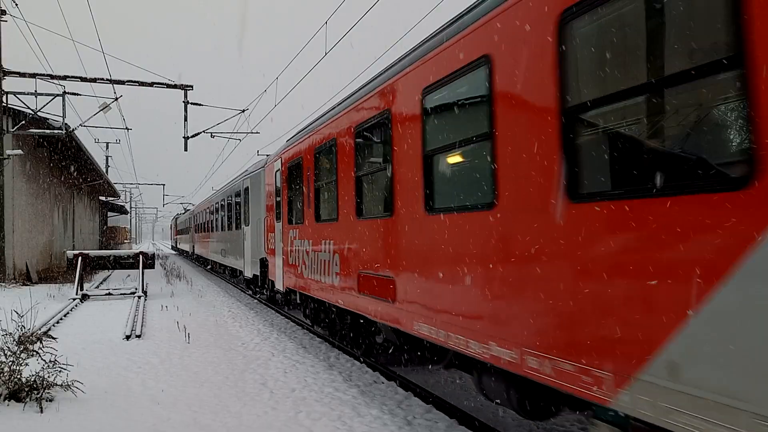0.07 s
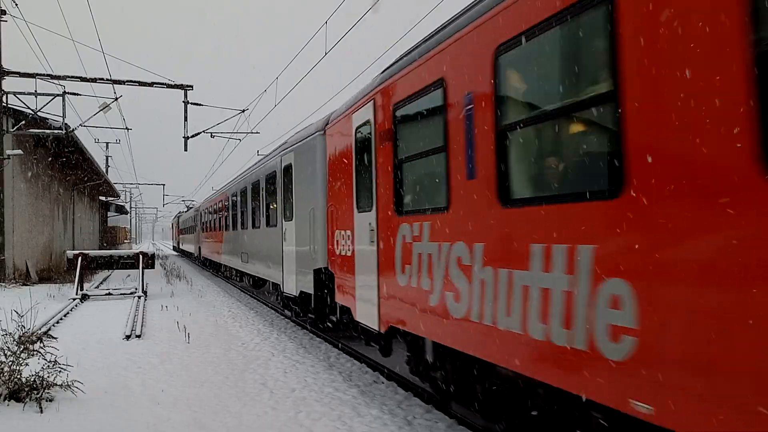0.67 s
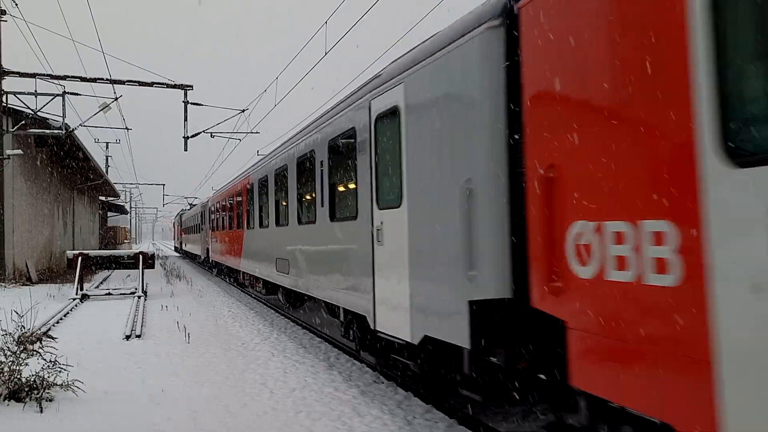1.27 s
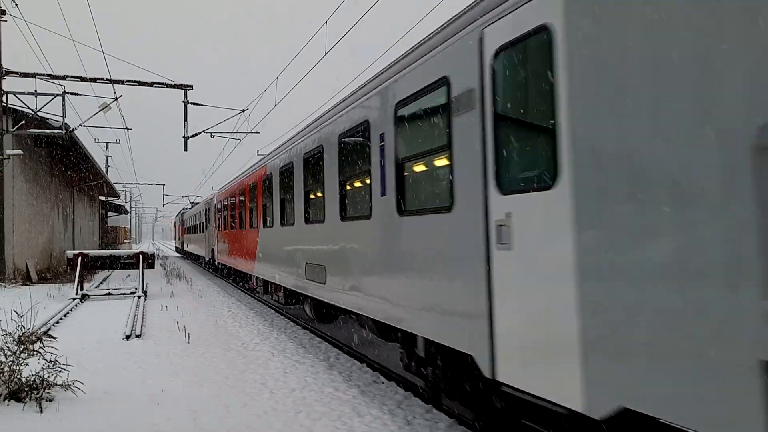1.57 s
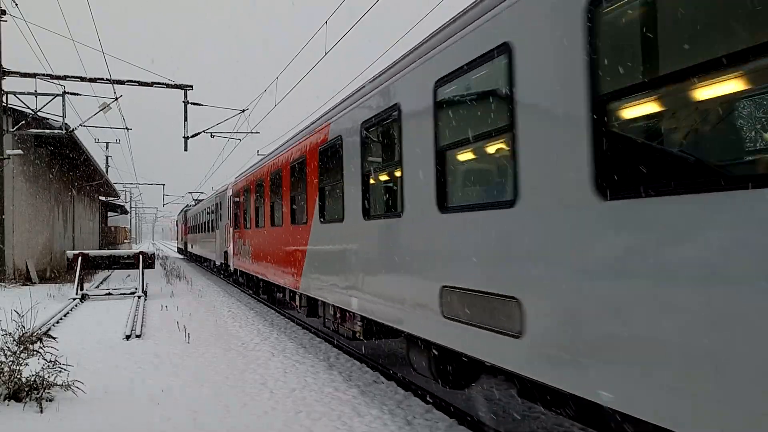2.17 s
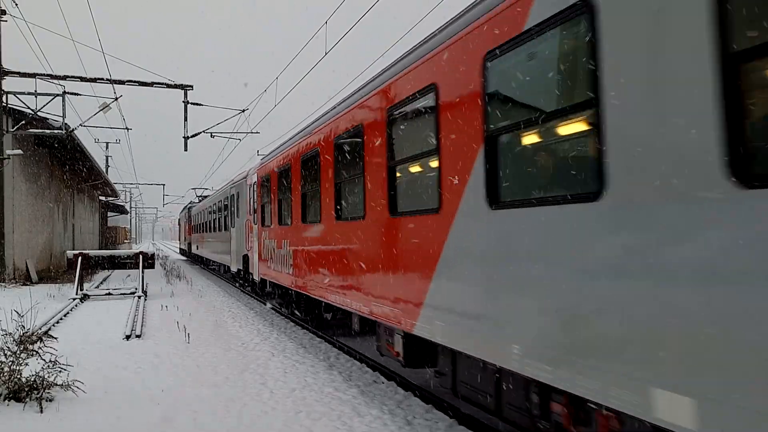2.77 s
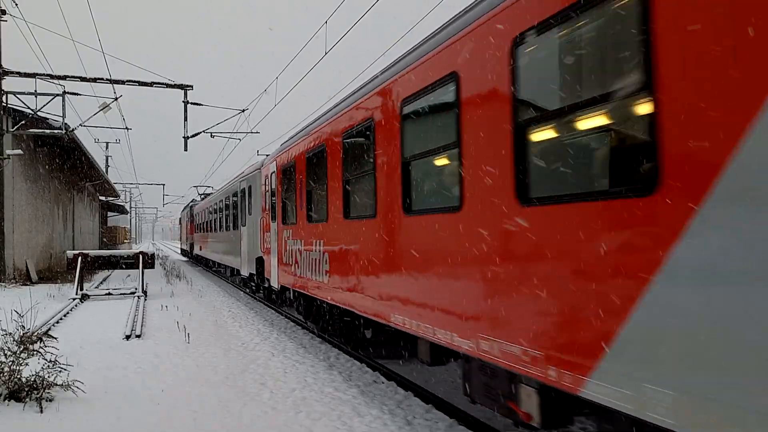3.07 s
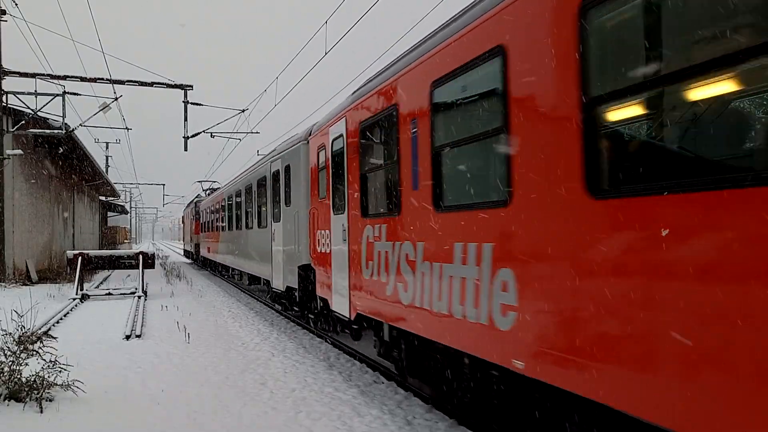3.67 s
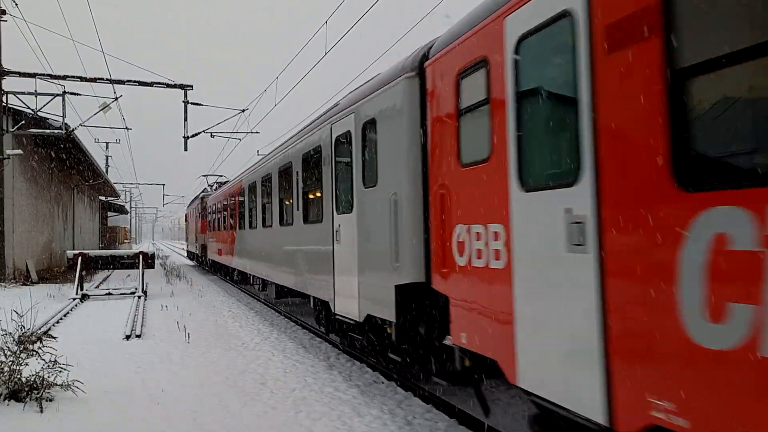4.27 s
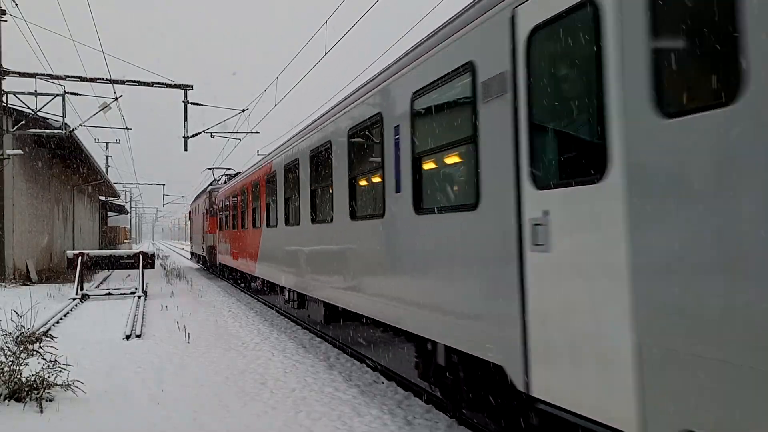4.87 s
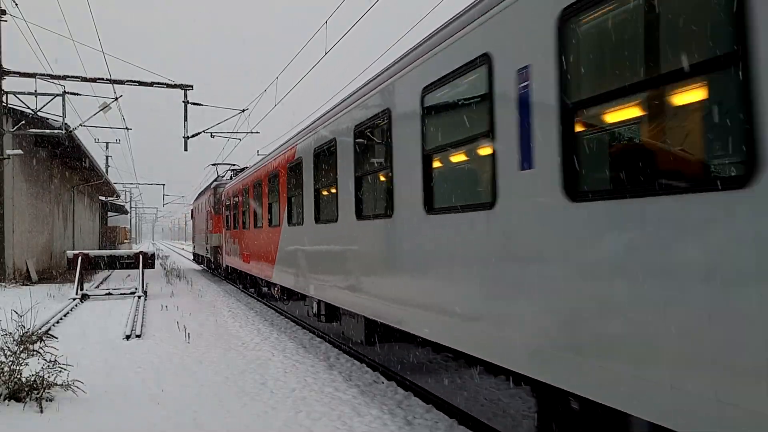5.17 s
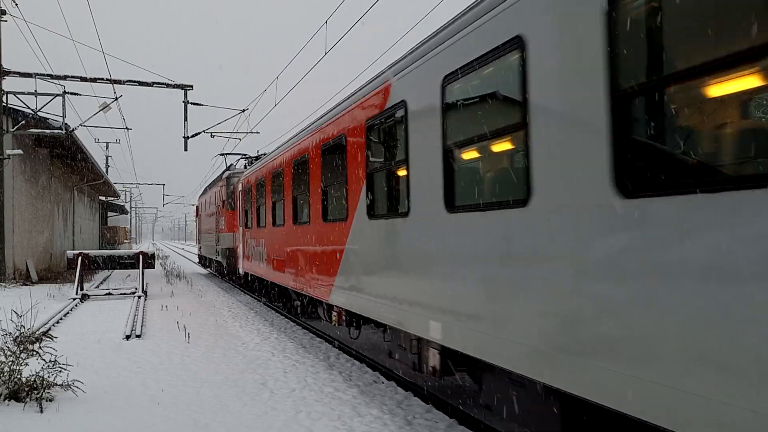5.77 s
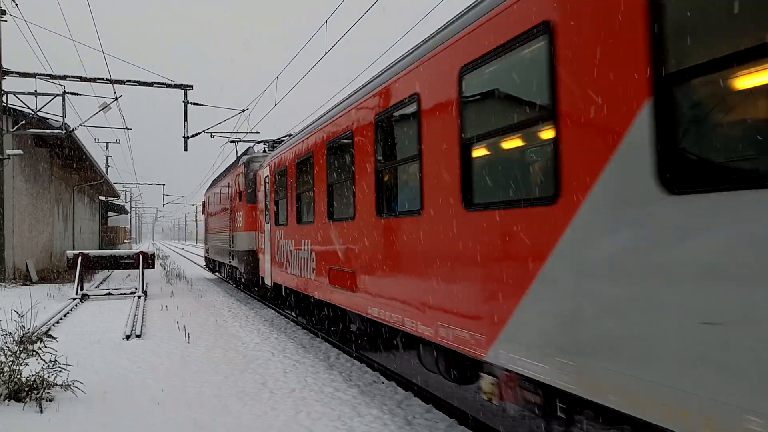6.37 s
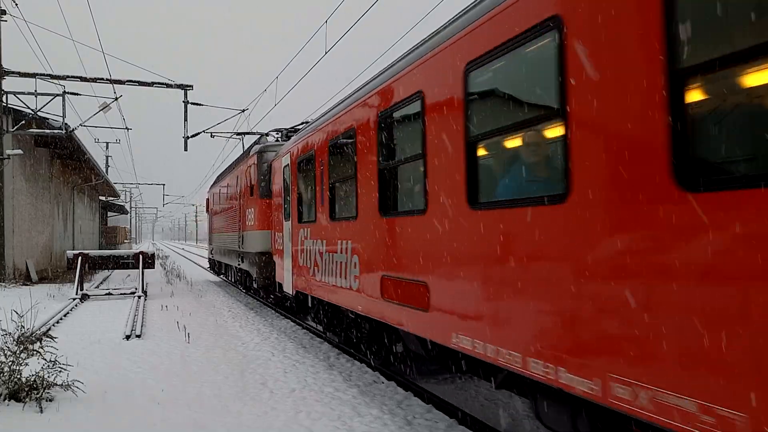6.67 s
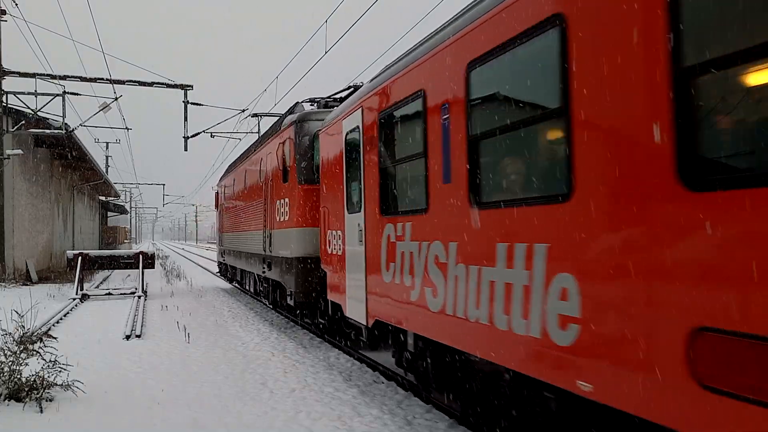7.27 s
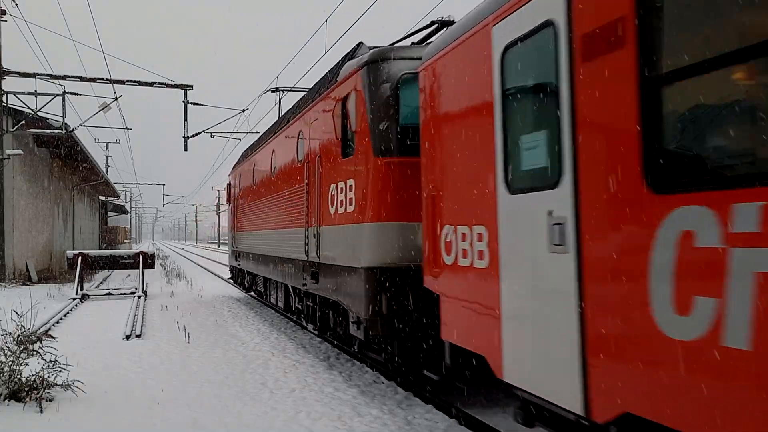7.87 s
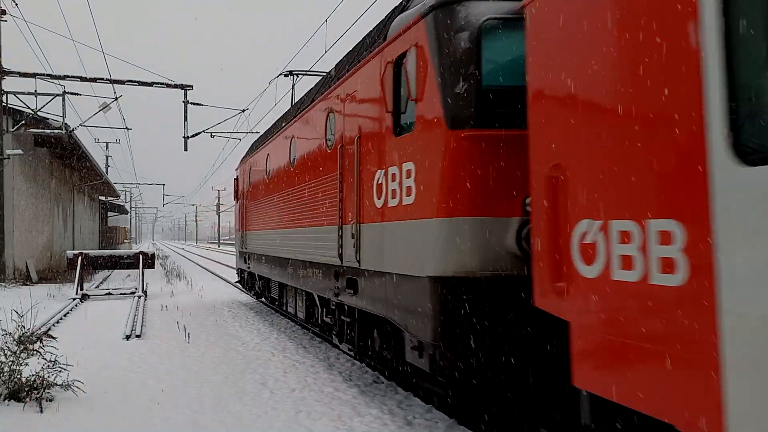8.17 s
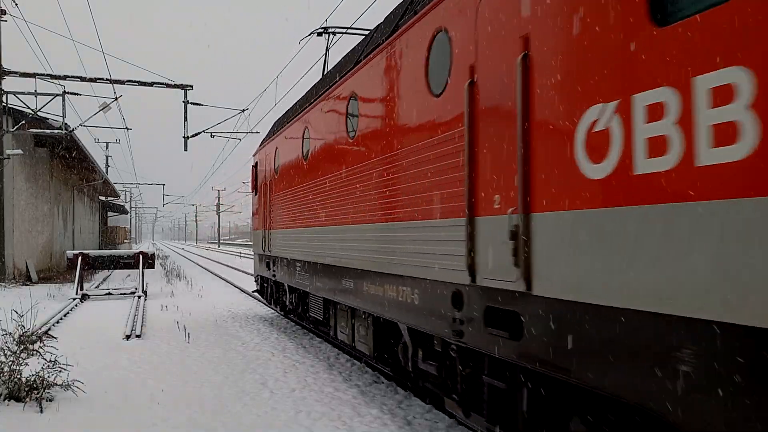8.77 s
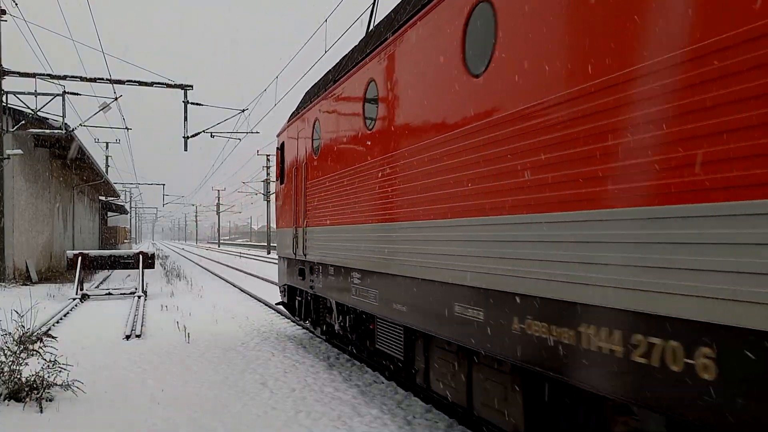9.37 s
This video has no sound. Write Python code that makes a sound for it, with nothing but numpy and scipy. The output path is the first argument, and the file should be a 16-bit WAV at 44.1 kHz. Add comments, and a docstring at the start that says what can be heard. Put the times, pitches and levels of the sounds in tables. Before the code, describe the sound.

A passenger train rumbles and hisses past close by, a valve releasing whistling compressed air before the locomotive follows with roaring fans and falling whine.

```python
"""Beside a snowy railway track, a passenger train rolls by a few metres to the right; a shed on the left
echoes it. The wheels make the track rumble, ring like bells and whirl up snow, and the train's wind thumps
the two microphones. A valve lets out compressed air for four seconds with a hoarse whistle. Last comes the
locomotive, pushing from behind, with roaring cooling fans, a hum and a falling gear whine."""
import sys
import numpy as np
from scipy import signal
from scipy.fft import rfft, irfft, next_fast_len
from scipy.io import wavfile
from scipy.ndimage import uniform_filter1d, map_coordinates

SR = 44100
rng = np.random.default_rng(int(sys.argv[2]) if len(sys.argv) > 2 else 0)


def inscribe(sig):
    """Save sig as 16-bit PCM at rate SR to the path in sys.argv[1].

    A 1-D sig is mono; a 2-D sig holds one channel per row.
    Samples are clipped to [-1, 1] before scaling.
    """
    pcm = np.round(np.clip(np.atleast_2d(sig).T, -1, 1) * 32767)
    wavfile.write(sys.argv[1], SR, pcm.astype(np.int16))


N = 419391
TIME = np.arange(N) / SR
SPEED_M_PER_S = 8
MIC_GAP_MS = 0.48  # time sound takes from one microphone to the other

# Levels are relative: the functions add their own gains. A "width" in seconds is half a bump's length.
# loudness of the passing coaches: t/s, rumble level/dB, hiss level/dB
COACH_LEVELS = [(0, -34.5, -42), (.4, -34.5, -40.5), (.75, -32, -40), (.8, -29, -39), (1.05, -29.5, -39.5),
                (1.2, -33, -44), (1.4, -33.5, -44), (1.62, -34, -44), (1.85, -34, -42), (2.1, -34.5, -46),
                (2.35, -33.5, -44), (2.82, -35.5, -43), (3.05, -38, -48), (3.45, -38, -48),
                (3.75, -37.5, -46.5), (4.1, -37.5, -47.5), (4.75, -35.5, -47), (5.1, -34.5, -45),
                (5.8, -36, -43), (6.3, -36, -46.5), (7.1, -36, -45), (7.65, -33.5, -45), (8, -38, -45.5)]
# tone colour of the track's rumble and of the wheels' hiss: f/Hz, level/dB
RUMBLE_COLOUR = [(25, -35), (55, -19), (75, -7), (105, -1.5), (165, -4), (215, -7), (255, -3.5), (320, -8),
                 (385, -4.5), (440, -1.5), (520, -6), (650, -13), (900, -20.5), (1400, -44.5)]
HISS_COLOUR = [(400, -28), (600, -4), (780, -2), (1000, 0), (1400, 0.5), (1700, -2), (2150, -2),
               (2350, -6.5), (2800, -6.5), (3050, -9.5), (3400, -10.5), (4300, -12), (6500, -22),
               (8000, -37), (16000, -46)]
# ringing notes of the track, the wheels, and one thin, high wheel ring: f/Hz, width/Hz, level/dB
TRACK_NOTES = [(254, 24, -12.5), (431, 26, -10)]
WHEEL_NOTES = [(1160, 90, -13), (1797, 110, -8.5), (1934, 110, -12)]
SIZZLE_NOTES = [(12150, 400, -51), (13450, 450, -49)]
# loudness of the ringing wheel rims: t/s, level/dB
RIM_LEVELS = [(0, -47), (.9, -48), (1.5, -55), (1.85, -46), (2.1, -53), (2.75, -46), (3.05, -49.5),
              (3.7, -47.5), (4.15, -50), (6.4, -51)]
# single wheels make the track drone, the last axles make it boom: t/s, hold/s, level/dB, f/Hz
TRACK_DRONES = [(0.803, .03, -28, 449), (1.356, 0.079, -30, 250), (1.788, 0.17, -32, 440),
                (2.218, 0.29, -36.5, 256), (5.057, 0.13, -33, 423.4), (5.605, 0.31, -33, 251),
                (7.547, 0.14, -34.5, 432)]
AXLE_BOOMS = [(7.48, 0.097, -27.5, 132.4), (7.681, 0.073, -26, 117.8), (7.795, 0.06, -21.5, 113.4)]
# tone colour of the valve's first rush and of its steady jet: f/Hz, level/dB
RUSH_COLOUR = [(3000, -30), (3500, -3), (3900, 2), (4550, 8.5), (5300, -1.5), (5800, -3), (6400, -7),
               (7500, 3.5), (8100, -4), (8600, -5), (9300, -4), (10000, -2), (10700, 5), (11400, 5),
               (12100, 2), (13200, 3.5), (14400, 0), (15600, 4)]
JET_COLOUR = [(3000, -24), (3700, -3), (5150, -2), (5600, -6), (6200, -11.5), (7600, -4.5), (8500, -5.5),
              (9100, -6.5), (9900, -7), (10900, -4), (12700, -2), (13700, -2), (14900, -2), (15700, 1)]
# strength of the jet: t/s, level/dB
JET_LEVELS = [(3.6, -43), (4.9, -50), (5.55, -40), (6.6, -39), (7.05, -34.5), (7.62, -35.5)]
# the jet's two whistles: f/Hz, width/Hz, level/dB, share the pitch sinks by, stereo spread
WHISTLE_NOTES = [(4740, 180, -34.5, .043, 2.3), (11810, 640, -35.5, 0.028, 3.2)]
# how far the whistles have formed: t/s, low one's level/dB, high one's level/dB
WHISTLE_GROWTH = [(3.6, -32, -36), (4.4, -12.5, -22), (5.27, -4.5, -5), (5.65, -3, 2), (7.4, -2.5, -0.5),
                  (7.64, -5, 1)]
# spurts of air pressure: t/s, width/s, low whistle's boost/dB, high whistle's boost/dB
SURGES = [(5.334, 0.022, 2.5, -3), (5.408, .03, 4.5, 4), (5.58, .04, 3, 1), (5.72, 0.075, 5.5, -1),
          (5.83, .035, 9.5, -3), (5.958, .035, 3.5, -2), (6.12, .04, 5, 0), (6.196, .025, 3, -1),
          (6.32, 0.043, 0, -2), (6.53, 0.053, 4.5, 0.5), (6.73, .04, 2.5, 0), (6.9, .055, 7.5, 5),
          (7.07, 0.03, 7, 2.5), (7.145, 0.024, 7, 1), (7.22, .045, 10, 1), (7.378, 0.032, 7.5, 3),
          (7.47, .04, 2, 5), (7.593, .04, 3, -1)]
# tone colour of booming axles, the locomotive's body and its cooling air: f/Hz, level/dB
BOOM_COLOUR = [(25, -45), (50, -13), (80, 2), (110, 11), (145, 7), (200, -16), (290, -37.5)]
DRONE_COLOUR = [(90, -53), (150, -4), (205, 7), (260, 1.5), (330, -0.5), (440, -.5), (540, -5.5),
                (650, -12.5), (900, -18.5), (1500, -28.5)]
BLOWER_COLOUR = [(300, -30), (600, -6), (950, -7.5), (1350, -5.5), (1850, -2.5), (2230, -5.5), (2800, -8.5),
                 (3600, -5), (4300, -11), (6000, -10.5), (8000, -23), (9000, -23.5), (13000, -22),
                 (15800, -36)]
# the locomotive's humming notes, each with one swell: f/Hz, level/dB, swell t/s, boost/dB
HUM_NOTES = [(141.6, -11.5, 9.3, 11.5), (161.2, -12, 8.55, 8), (209.9, -11.5, 8.13, 13.5),
             (251, -15.5, 9.33, 12), (408.5, -8, 9.05, 4.5), (529, -13, 8.02, 8.5)]
# directions of the locomotive and of the shed's echo: t/s, delay at the left microphone/ms
LOCOMOTIVE_LAG = [(6.5, -0.013), (8, -0.027), (8.7, 0.086), (9.5, 0.25)]
ECHO_LAG = [(0, -0.31), (4, -0.47), (6.3, -0.4), (7.5, -0.39), (8.8, -0.48)]
# falling pitch of the gear teeth: t/s, f/Hz
GEAR_PITCH = [(6, 2344), (7.6, 2120), (8.4, 1894), (9.5, 1543)]
# the motor's upper and lower note: share of the gear pitch, level/dB
MOTOR_NOTES = [(.25, 0.46), (.087, 5.2)]
# brief swells of the gear whine and of the upper motor note: t/s, width/s, boost/dB
GEAR_FLARES = [(8.38, 0.072, 9), (8.72, 0.09, 5.5)]
MOTOR_FLARES = [(8.27, 0.052, 10.5), (8.97, 0.11, 15.5)]
# squeals of a flange (a wheel's guiding lip), wind gusts and snow clouds: t/s, hold/s, level/dB
SQUEALS = [(6.7, 0.93, -45), (7.7, 0.13, -36.5), (7.98, 0.08, -34.5)]
GUSTS = [(.81, 0.324, -22.5), (2.6, 0.4, -34), (3.18, 0.6, -31), (3.95, 0.55, -35.5), (5.42, 0.4, -36.5)]
SNOW_CLOUDS = [(.42, 0.23, -41.5), (2.7, 0.46, -56.5)]
# swirls of air hitting the microphones: t/s, peak level/dB, f/Hz, left minus right/dB, width/s
EDDIES = [(0.584, -21, 450, 0, .006), (0.853, -18, 128, -13, 0.015), (0.948, -16, 150, -1, .012),
          (1.015, -17.5, 140, 10, .008), (1.049, -17, 190, -11, .006), (1.106, -12.5, 250, -10, 0.0064),
          (1.144, -16, 130, 2, 0.011), (1.411, -26, 160, 5, .009), (1.771, -22, 540, 0, .004),
          (1.862, -20, 430, -1, .005), (2.066, -17.5, 170, 0, .012), (2.357, -16, 160, -1, 0.011),
          (2.684, -18.5, 114, 2, 0.013), (2.968, -20, 115, -1, 0.015), (3.032, -21, 125, 0, .006),
          (3.071, -23, 130, 0, .005), (3.152, -16.5, 260, -1, 0.0067), (3.161, -10.5, 170, 1, 0.0053),
          (3.184, -15, 100, 3, 0.011), (3.242, -20, 110, -5, .009), (3.296, -21, 95, -4, .012),
          (3.351, -14, 280, -3, 0.0096), (3.396, -11.5, 330, 0, 0.0066), (3.415, -18, 230, 10, 0.0066),
          (3.472, -24, 450, 0, 0.0026), (3.5, -15, 170, -5, 0.012), (3.536, -18.5, 240, -6, 0.0081),
          (3.644, -10.5, 125, 0, 0.0058), (3.661, -19, 238, -2, 0.0055), (3.955, -21, 120, -2, 0.018),
          (4.07, -23, 110, 0, .008), (4.12, -16.5, 280, -2, 0.0065), (4.136, -17.5, 120, 3, 0.0095),
          (4.202, -15.5, 130, -1, 0.0041), (4.31, -19.5, 220, 1, .012), (4.61, -19, 118, -1, .012),
          (5.121, -24, 125, 2, 0.011), (5.277, -26, 127, -1, .012), (5.4, -24.5, 120, -1, 0.013),
          (5.553, -19, 115, 1, 0.0098), (5.69, -21, 120, 0, 0.017)]
# tone colour of the wind and of the spraying snow: f/Hz, level/dB
WIND_COLOUR = [(20, -16), (40, -12), (70, -4), (110, 8), (190, -4), (300, -3.5), (450, -9), (700, -27),
               (1200, -44.5)]
SNOW_COLOUR = [(5000, -3), (8000, -15.5), (9000, -7.5), (12500, 0), (14000, -2.5), (16000, -5)]


def coaches(rumble_db=3.5, wheels_db=3, throb_db=1.93, echo_db=-6, scatter_db=-8, sizzle_s=0.93):
    """Rough wheels shake the track, hiss on the rail and ring at their own notes."""
    track_db, wheel_db = curves(COACH_LEVELS) - leaving_db()
    rumble = coloured(scattered() + arriving(MIC_GAP_MS), RUMBLE_COLOUR)
    for hz, width, db in TRACK_NOTES:
        rumble += amp(db + 1.1 * wobble(5.1)) * ringing(hz, width, lag_ms=0.25, spread=0.32)
    rumble *= amp(track_db + rumble_db + throb_db * wobble(22))
    paths = arriving(MIC_GAP_MS) + amp(echo_db) * arriving(curves(ECHO_LAG)[0])
    wheels = coloured(paths + amp(scatter_db) * scattered(), HISS_COLOUR)
    for hz, width, db in WHEEL_NOTES:  # each note shifts as one wheel after another takes it up
        wheels += amp(db + 2 * wobble(11)) * ringing(hz + 30 * wobble(16), width, MIC_GAP_MS, spread=1)
    sizzle = 0
    for hz, width, db in SIZZLE_NOTES:
        gain = swells([(sizzle_s, 0.08, db)], rise_s=0.05, fall_s=0.27)
        sizzle += gain * ringing(hz, width, MIC_GAP_MS, spread=1.5)
    return rumble + wheels * amp(wheel_db + wheels_db + 1.1 * wobble(16)) + sizzle


def wheel_rims(hz=2095, width_hz=45, waver_hz=22, flutter_db=2):
    """The rims' strongest note rings on through the hiss, wavering in pitch and strength."""
    level_db = curves(RIM_LEVELS)[0] + flutter_db * wobble(11) - leaving_db()
    return amp(level_db) * ringing(hz + waver_hz * wobble(14), width_hz, MIC_GAP_MS, spread=0.92)


def track_drones(width_hz=22):
    """Now and then a wheel makes the track drone at one of its own notes."""
    return sum(swells([(s, hold, db)], rise_s=0.034, fall_s=0.034)
               * ringing(hz, width_hz, lag_ms=0.19, spread=0.21) for s, hold, db, hz in TRACK_DRONES)


def axle_booms(note_db=-1, thud_db=-3):
    """The last coach's axles thud and set the track booming at a low note."""
    thud = amp(thud_db) * coloured(scattered() + arriving(0), BOOM_COLOUR)
    return sum(swells([(s, hold, db)], rise_s=0.03, fall_s=0.018) * (amp(note_db) * tone(hz) + thud)
               for s, hold, db, hz in AXLE_BOOMS)


def air_valve(open_s=3.583, shut_s=7.645, rush_db=-24.5, pipe_db=-37, jet_db=5.5, middle_db=-46):
    """A valve snaps open with a rush of air that rings its pipe, then settles into a whistling jet."""
    flow_db, = curves(JET_LEVELS)
    age = np.maximum(TIME - open_s, 0)
    opening = np.clip(age / 0.0079, 0, 1) * np.clip((shut_s - TIME) / 0.0081 + 1, 0, 1)
    spent_db = 5 * age + 16 * np.clip(age - 0.14, 0, 0.43)  # a slow fade, with a faster drop early on
    rush = amp(rush_db - spent_db) * coloured(warbling_hiss(), RUSH_COLOUR)
    pipe = amp(pipe_db - 9.5 * age) * ringing(hz=4170, width_hz=210, lag_ms=0.404, spread=0.87)
    jet = amp(flow_db + jet_db) * coloured(warbling_hiss(), JET_COLOUR)
    # a weak middle whistle follows the strength of the jet
    middle = ringing(hz=8550 + 120 * wobble(8), width_hz=600, lag_ms=0.457, spread=1)
    middle *= amp(middle_db + flow_db - flow_db.max())
    lean_right = amp([[-0.6], [0.6]])
    return opening * (rush + pipe + jet + middle + whistles()) * lean_right


def warbling_hiss(warble_db=2.3, flutter_db=1.2):
    """A fluttering hiss with a faint watery warble, like compressed audio."""
    bands = signal.stft(noise(2) + 0.39 * arriving(0.45), nperseg=512)[2]
    warble = uniform_filter1d(rng.standard_normal(bands.shape[1:]), size=4, axis=0)  # blur in pitch
    warble = uniform_filter1d(warble, size=11, axis=1)  # blur in time
    hiss = signal.istft(bands * amp(warble_db * unit(warble)), nperseg=512)[1][:, :N]
    return hiss * amp(flutter_db * wobble(70))


def whistles(pass_s=5.85, distance_m=7, waver_hz=30, rasp_db=1.7):
    """Two hoarse whistles grow, spurt with the pressure and sink in pitch as the valve goes by."""
    along_m = SPEED_M_PER_S * (TIME - pass_s)
    receding = along_m / np.hypot(along_m, distance_m)  # -1 coming, +1 going
    times, widths, *boosts = np.transpose(SURGES)
    sound = 0
    for note, growth_db, boost_db in zip(WHISTLE_NOTES, curves(WHISTLE_GROWTH), boosts):
        hz, width, db, sink, spread = note
        level_db = db + growth_db + flares(zip(times, widths, boost_db)) + rasp_db * wobble(70)
        pitch = hz * (1 - sink * receding) + waver_hz * wobble(50)
        sound += amp(level_db) * ringing(pitch, width, lag_ms=0.437, spread=spread)
    return sound


def locomotive(boom_db=-24, drone_db=-23, roar_db=-0.5, blower_db=-28, echo_db=1.5, swell_width_s=0.16):
    """Heavy wheel frames boom, the body drones and hums, and cooling air roars from the grilles."""
    lag, = curves(LOCOMOTIVE_LAG)
    boom = amp(boom_db + 1.8 * wobble(14)) * coloured(scattered(), BOOM_COLOUR)
    boom *= nearness(pass_s=9.36, distance_m=4.2)
    hum = sum(amp(db + flares([(s, swell_width_s, boost_db)])) * tone(hz, lag)
              for hz, db, s, boost_db in HUM_NOTES)
    hum *= amp(np.interp(TIME, [7.5, 8.2], [-6, 0]))  # the last coach blocks the hum at first
    roar = amp(roar_db) * coloured(scattered(), DRONE_COLOUR)
    drone = amp(drone_db) * nearness(pass_s=9.42, distance_m=7.5) * (roar + hum)
    air = arriving(lag) + amp(echo_db) * arriving(curves(ECHO_LAG)[0]) + scattered()
    blower = amp(blower_db + 1.24 * wobble(23)) * coloured(air, BLOWER_COLOUR)
    blower *= nearness(pass_s=8.84, distance_m=5.74)
    return behind_coaches() * (boom + drone) + blower


def gear_whine(level_db=-39.5, width_hz=30, waver_hz=11, flutter_db=2):
    """Meshing gear teeth whine roughly, and two motor notes fall in pitch along with them."""
    gear_hz, = curves(GEAR_PITCH)
    gain = amp(flares(GEAR_FLARES) + flutter_db * wobble(18))
    gear = gain * ringing(gear_hz + waver_hz * wobble(22), width_hz, curves(ECHO_LAG)[0], spread=0.66)
    upper, lower = [amp(db) * tone(gear_hz * share) for share, db in MOTOR_NOTES]
    motor = amp(flares(MOTOR_FLARES)) * upper + lower
    return amp(level_db) * behind_coaches() * nearness(pass_s=8.6, distance_m=5.1) * (gear + motor)


def flange_squeal(hz=2465, width_hz=75, waver_hz=11):
    """The guiding lip of a wheel sings briefly."""
    squeal = ringing(hz + waver_hz * wobble(11), width_hz, curves(ECHO_LAG)[0], spread=0.95)
    return swells(SQUEALS, rise_s=0.026, fall_s=0.069) * squeal


def train_wind(draught_db=-49, eddy_db=1, eddy_top_hz=740, spread=0.94):
    """Air dragged along by the train pushes on the microphones in lumpy gusts and short, dull thumps."""
    lumps = amp([wobble(40), wobble(40)])
    strength = amp(draught_db) + swells(GUSTS, rise_s=0.02, fall_s=0.027)
    wind = strength * unit(lumps * coloured(noise(2), WIND_COLOUR))
    t = TIME[:SR // 5] - TIME[SR // 10]  # 0.1 s either side of a thump
    f = np.fft.rfftfreq(len(t), 1 / SR) + 1
    for s, db, hz, pan_db, width_s in EDDIES:
        band = np.exp(-(np.log(f / hz) / 0.76) ** 2) / (1 + (f / eddy_top_hz) ** 6)
        swirl = rng.standard_normal(len(t)) + spread * rng.standard_normal((2, len(t)))
        thump = irfft(rfft(swirl) * band, len(t)) * np.exp(-(t / width_s) ** 2 / 2)
        thump /= np.abs(thump).max(axis=1, keepdims=True)
        start = round((s + t[0]) * SR)
        wind[:, start:start + len(t)] += thump * amp(db + eddy_db + pan_db * np.array([[0.5], [-0.5]]))
    return wind


def snow_spray(level_db=3, steady_db=-66):
    """Fine snow sprays along the train's underside, in clouds over a thin, steady drift."""
    spray = swells(SNOW_CLOUDS, rise_s=0.63, fall_s=0.28) + amp(steady_db)
    return spray * amp(level_db + 2 * wobble(4)) * coloured(noise(2), SNOW_COLOUR)


def nearness(pass_s, distance_m):
    """Gain of a source riding by: 1 when nearest, half at twice the distance."""
    return distance_m / np.hypot(distance_m, SPEED_M_PER_S * (TIME - pass_s))


def leaving_db(last_coach_s=8.73, db_per_s=17):
    """Decibels the rolling loses once the last coach is by."""
    return db_per_s * np.maximum(TIME - last_coach_s, 0)


def behind_coaches(clear_s=7.4, db_per_s=7.5):
    """Gain that rises to 1 as the coaches stop blocking the locomotive."""
    return amp(-db_per_s * np.maximum(clear_s - TIME, 0))


def ringing(hz, width_hz, lag_ms, spread):
    """A rough note driven by noise; more spread makes left and right less alike."""
    rate = 10 * width_hz  # the strength changes slowly, so few values a second will do
    size = next_fast_len(int(N * rate / SR) + 2)
    peak = 1 / (1 + 2 * (np.fft.fftfreq(size, 1 / rate) / width_hz) ** 2)
    shaking = rng.standard_normal((size, 3, 2)) @ [1, 1j]
    common, left, right = np.fft.ifft(peak * np.fft.fft(shaking, axis=0).T)
    strength = np.array([np.interp(TIME * rate, np.arange(size), common + spread * own)
                         for own in (left, right)])
    phase = 2 * np.pi * np.cumsum(hz * np.ones(N)) / SR
    phases = np.array([phase - 2 * np.pi * hz * lag_ms / 1000, phase])
    return unit(strength.real * np.cos(phases) - strength.imag * np.sin(phases))


def tone(hz, lag_ms=0, waver=0.00648, unsteady_db=2.5):
    """A clean note that wavers a little in pitch and level."""
    phase = 2 * np.pi * np.cumsum(hz * (1 + waver * wobble(14))) / SR
    phases = np.array([phase - 2 * np.pi * hz * lag_ms / 1000, phase])
    return unit(amp(unsteady_db * wobble(9)) * np.sin(phases))


def arriving(lag_ms):
    """White noise from one direction: the left microphone hears it lag_ms late."""
    fine = signal.resample_poly(noise()[0], up=4, down=1)  # allows quarter-sample delays
    index = np.array([TIME - lag_ms / 2000, TIME + lag_ms / 2000]) * SR * 4
    return unit(fine[np.clip(np.rint(index).astype(int), 0, len(fine) - 1)])


def scattered():
    """White noise from all sides: only its low notes are alike at both microphones."""
    alike = lambda hz: np.sinc(2 * hz * MIC_GAP_MS / 1000)
    mid, side = filtered(noise(2), lambda hz: np.sqrt([1 + alike(hz), 1 - alike(hz)]))
    return unit(np.array([mid + side, mid - side]))


def noise(channels=1):
    """White noise: an even hiss."""
    return rng.standard_normal((channels, N))


def coloured(x, colour):
    """x shaped by a tone colour table, at average power 1."""
    f, db = np.transpose(colour)
    return unit(filtered(x, lambda hz: amp(np.interp(np.log(hz + 1), np.log(f), db, left=-120))))


def filtered(x, response):
    """x with each frequency scaled by response(hz)."""
    size = next_fast_len(N + SR // 4)
    return irfft(rfft(x, size) * response(np.fft.rfftfreq(size, 1 / SR)), size)[..., :N]


def swells(rows, rise_s, fall_s):
    """Gain of events that rise until their time, hold, then die away."""
    return sum(amp(db) * np.exp(-np.maximum(s - TIME, 0) / rise_s)
               * np.exp(-np.maximum(TIME - s - hold, 0) / fall_s) for s, hold, db in rows)


def flares(rows):
    """Decibels added by smooth bumps."""
    return sum(db * np.exp(-((TIME - s) / width_s) ** 2) for s, width_s, db in rows)


def curves(rows):
    """Join a table's points over time: one curve for each column after the first."""
    times, *columns = np.transpose(rows)
    return [np.interp(TIME, times, column) for column in columns]


def wobble(rate):
    """A smooth curve through rate random points a second."""
    return map_coordinates(rng.standard_normal(int(N * rate / SR) + 4), [TIME * rate], order=2)


def amp(db):
    """Decibels to gain."""
    return 10 ** (np.asarray(db) / 20)


def unit(x):
    """Scale to average power 1."""
    return x / np.sqrt(np.mean(np.abs(x) ** 2) + 1e-20)


def scene():
    """Everything that reaches the two microphones."""
    rolling = coaches() + wheel_rims() + track_drones() + axle_booms()
    air = snow_spray() + train_wind() + air_valve()
    return rolling + air + locomotive() + gear_whine() + flange_squeal()


def record(dry, top_hz=15900):
    """Cut away the very highest treble."""
    return filtered(dry, lambda hz: hz < top_hz)


dry = scene()
out = record(dry)
inscribe(out)
```